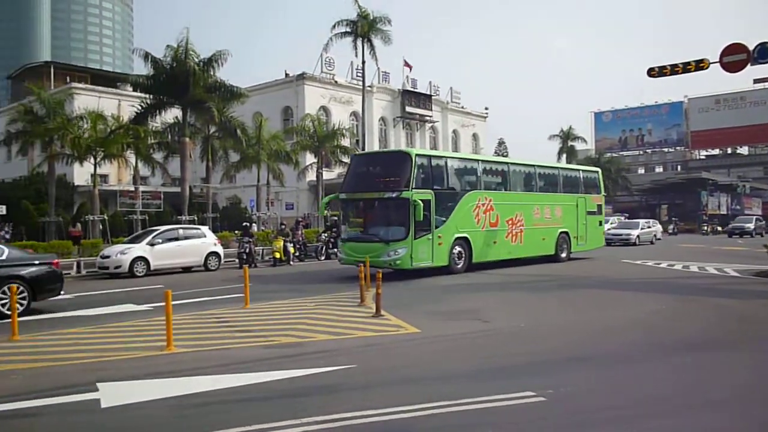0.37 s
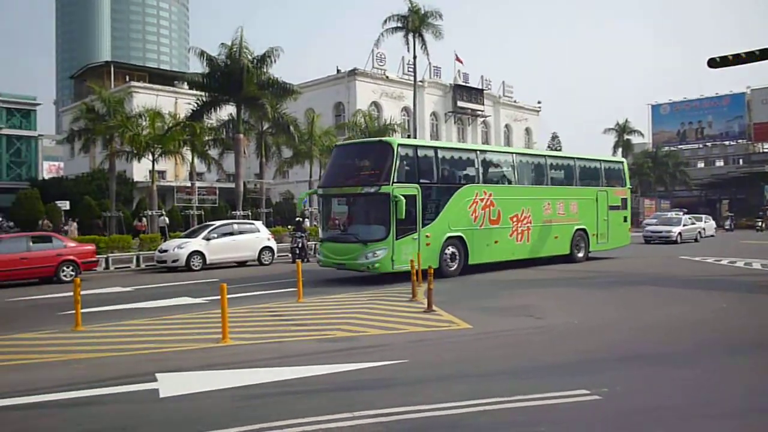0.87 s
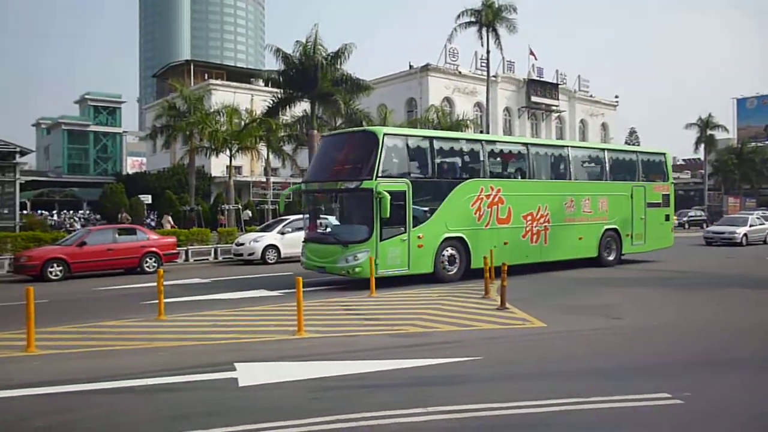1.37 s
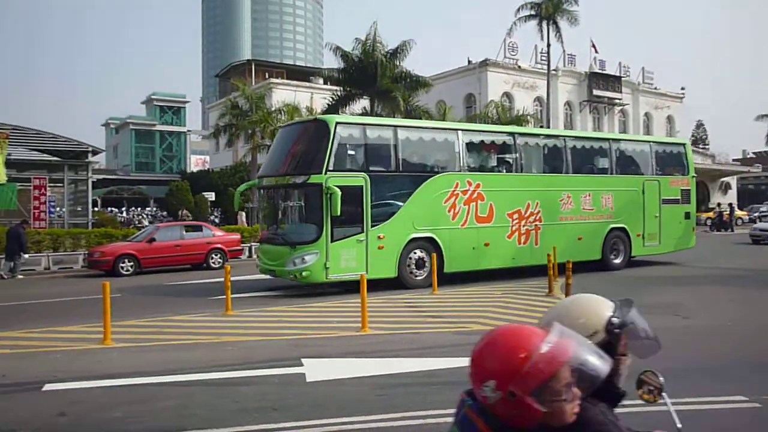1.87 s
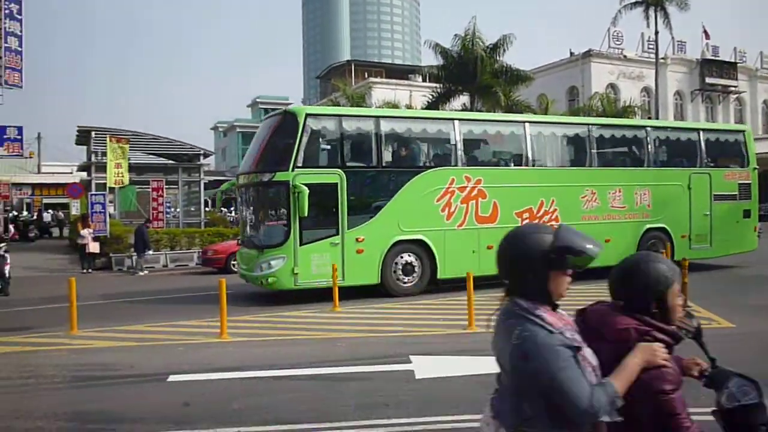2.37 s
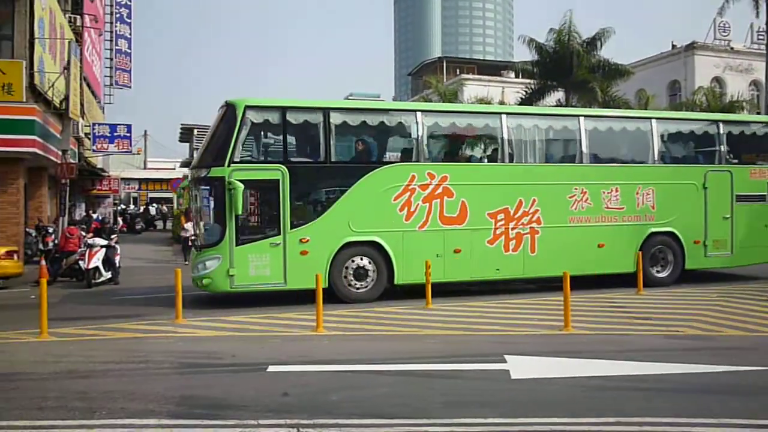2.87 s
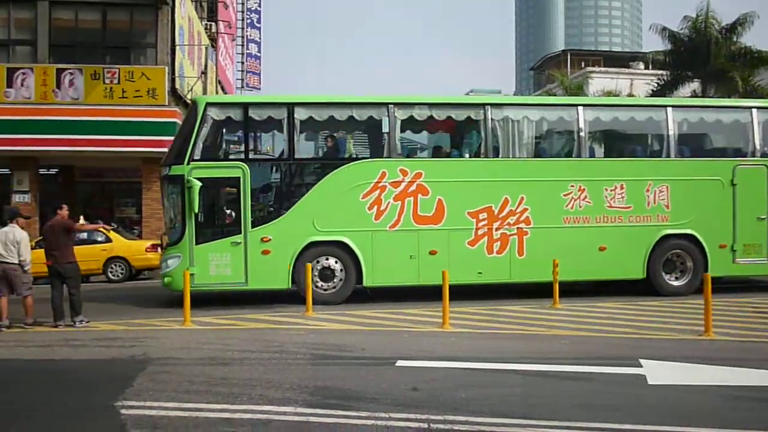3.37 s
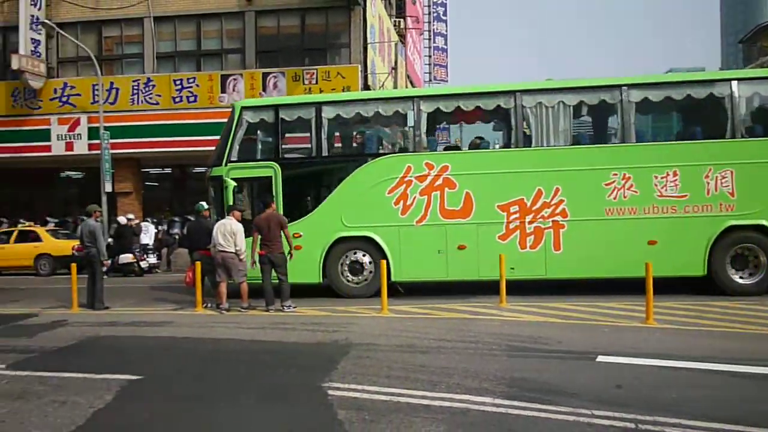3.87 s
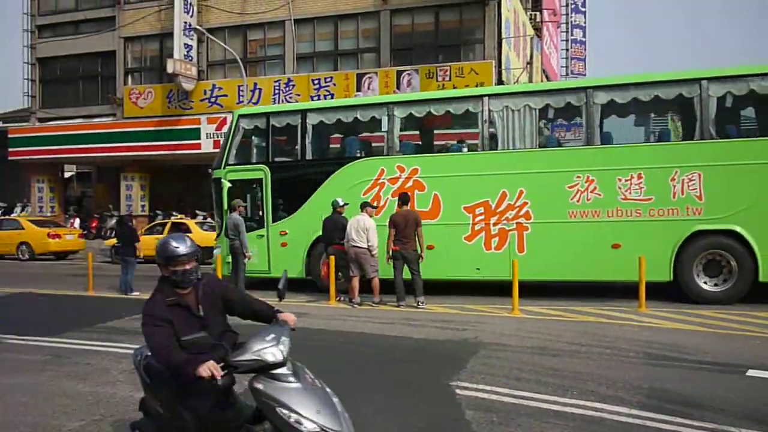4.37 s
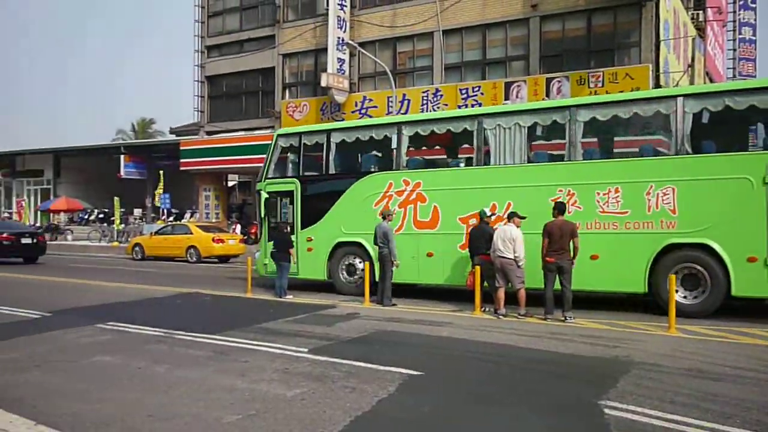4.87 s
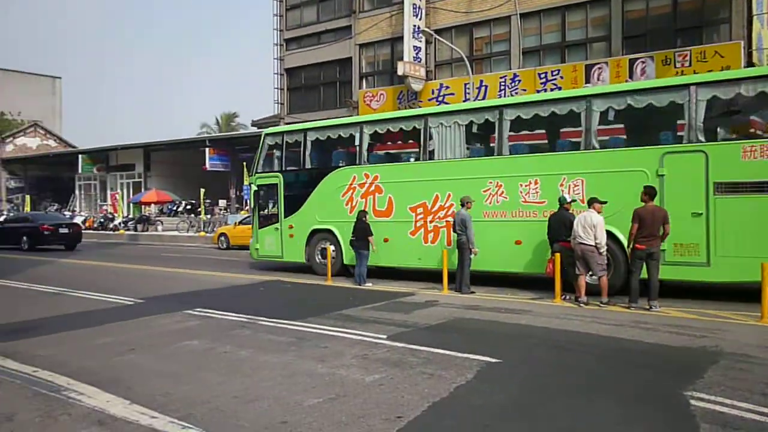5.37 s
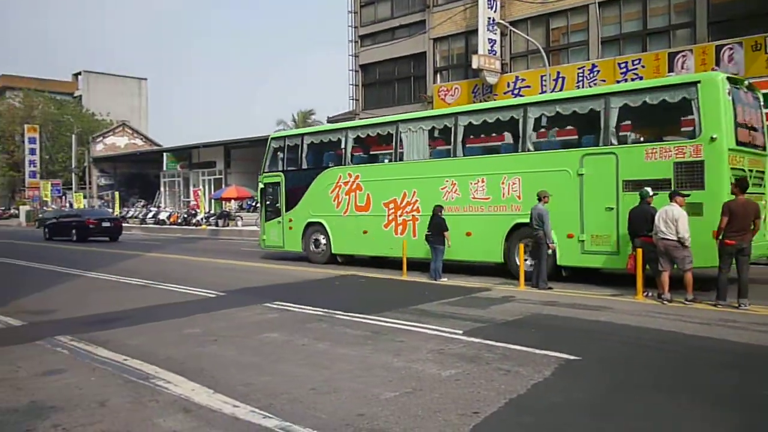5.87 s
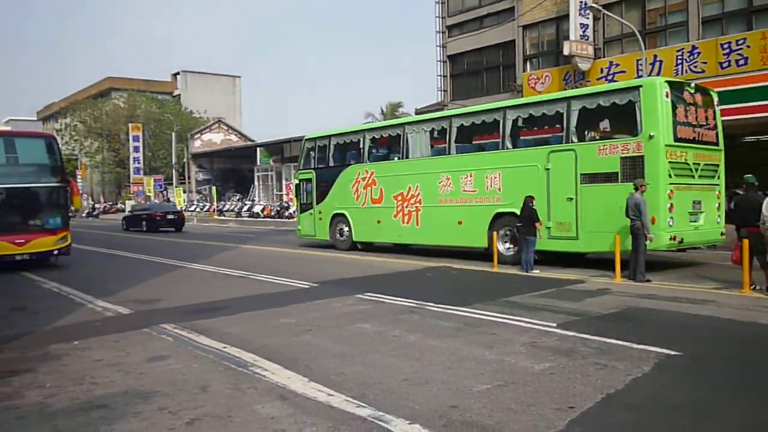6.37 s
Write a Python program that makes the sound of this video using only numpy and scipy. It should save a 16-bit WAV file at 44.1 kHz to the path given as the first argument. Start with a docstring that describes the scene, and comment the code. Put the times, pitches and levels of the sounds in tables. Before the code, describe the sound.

A small camera microphone stands in the wind beside a busy city junction. From 0 s a dull, lumpy traffic drone runs continuously, with soft hiss and low hums from passing vehicles. Wind thumps begin around 0.4 s and come in rough clusters, momentarily pushing the rest down. A faint, very short puff of air comes at 1.1 s. Breathier whines pass from 1.5 to 2.6 s, with hiss strongest near 1.9 s. From 2 to 3.2 s a deep engine throb sags in pitch and fades. Gusts grow hardest from 3.2 to 3.85 s, slightly overloading, then abruptly cease; the street is quieter. A new engine note enters, dips until 4.4 s, then climbs. A vehicle whines by from 4.6 to 5.1 s; at 4.9 s the engine opens into a hollow boom, gradually receding as it rises slightly. Crisp air-valve spits sound at 6.2 s and just before the end, at 6.7 s.

```python
"""Busy roundabout in the wind

Distant traffic is bands of shaped noise; vehicles whine past as noise in unsteady resonances.
A near engine, a harmonic series on its firing rate, sags and climbs; three puffs of air, the first
fainter and shorter, are shaped noise bursts. Wind thumps are short pressure swings with rough edges;
the level of the other sounds steps down and recovers.
Soft overload, four notches and a band limit make the sound of a small camera."""
import sys
import numpy as np
from scipy import signal
from scipy.io import wavfile
from scipy.ndimage import uniform_filter1d

SR = 44100
rng = np.random.default_rng(int(sys.argv[2]) if len(sys.argv) > 2 else 0)


def generate_wav(signal):
    """Clip the signal to [-1, 1] and save it as 16-bit WAV at the path in sys.argv[1]."""
    frames = np.transpose(np.atleast_2d(signal))
    scaled = np.clip(frames, -1, 1) * 32767
    pcm = np.round(scaled).astype(np.int16)
    wavfile.write(sys.argv[1], SR, pcm)


def ratio_of_db(decibels):
    """Turn decibels (scalar or array-like) into linear amplitude factors; 0 dB maps to 1."""
    return 10 ** (np.asarray(decibels, float) / 20)


N = 297234  # length in samples

# relative spectra of the traffic and wind layers, lowest first: frequency_hz, density_db
RUMBLE_SPECTRUM = [(15, -16), (30, -10.5), (70, -1), (130, 3.5), (250, -5.5), (450, -7), (1000, -23.5)]
DRONE_SPECTRUM = [(25, -20.5), (60, -9), (110, -5.5), (170, 2), (300, -0.5), (480, -4.5), (800, -25.5)]
ROAR_SPECTRUM = [(250, -5), (500, -4), (750, -1.5), (1200, -7.5), (1450, -14), (1900, -40)]
HISS_SPECTRUM = [(1100, -36.5), (1700, 0), (2200, -2.5), (2750, -1), (3600, -5), (5000, -16.5)]
FIZZ_SPECTRUM = [(2800, -25.5), (4200, 0.5), (5500, 0.5), (7000, -0.5), (8200, -12.5), (8900, -19)]
# level of the distant traffic: time_s, level_db
STREET_LEVEL = [(0, -30), (.5, -29), (.95, -30), (1.2, -27), (1.45, -30.5), (1.8, -32), (2.2, -30),
                (2.6, -29), (3.1, -29.5), (3.6, -31.5), (3.86, -35.5), (4.3, -34), (4.6, -29), (5.0, -30),
                (5.3, -33.5), (5.9, -34.5), (6.4, -36), (6.74, -35)]
# strength of the wind buffeting the microphone: time_s, level_db
WIND_LEVEL = [(0, -29.5), (.6, -29), (.85, -27.5), (1.2, -24), (1.5, -28.5), (1.8, -28), (2.3, -36),
              (2.6, -25.5), (2.8, -32), (3.05, -22), (3.35, -26.5), (3.62, -17.5), (3.84, -23), (3.88, -38),
              (4.2, -42), (4.6, -34), (5.6, -34.5), (6.74, -34)]
# vehicles going by, which add hiss and fizz: closest_s, fizz_db, half_power_s (time until 3 dB softer)
PASSES = [(.6, -47.5, -0.3), (1.3, -45.5, 0.23), (1.9, -39.5, 0.28), (2.5, -41.5, 0.23), (3.5, -43, .2),
          (4.7, -40.5, 0.1879), (5.8, -48, 0.84)]
# levels relative to the street, but BUFFET_DB (drone) to the wind and PASS_HISS_DB to the fizz of a pass
DRONE_DB, HISS_DB, FIZZ_DB, BUFFET_DB, PASS_HISS_DB = 1.5, -10.5, -19.5, 2, 1

# hardest wind thumps on the microphone: centre_s, swing_db, pitch_hz
HARD_THUMPS = [(0.426, -13.5, 140), (0.57, -13, 257), (0.949, -12, 177), (1.029, -15, 198),
               (1.173, -9, 173), (1.395, -10, 222), (1.43, -14.5, 158), (1.583, -19, 305),
               (1.614, -13, 380), (1.63, -13.5, 222), (1.662, -9, 242), (1.77, -14.5, 189),
               (1.906, -13, 250), (1.914, -14.5, 229), (1.927, -13, 209), (1.975, -11.5, 200),
               (2.034, -15.5, 140.2), (2.547, -12, 165), (2.584, -13.5, 382), (2.642, -12.5, 175),
               (2.75, -16, 259), (2.838, -13.5, 420), (2.848, -13.5, 255), (3.006, -11.5, 239),
               (3.03, -13, 139), (3.214, -10.5, 214), (3.226, -12.5, 252), (3.259, -8.5, 167.2),
               (3.426, -11, 327), (3.494, -14, 110), (3.504, -8.5, 205), (3.54, -11, 180),
               (3.6, -10.5, 143), (3.616, -9.5, 280), (3.651, -10, 285), (3.667, -11.5, 253),
               (3.691, -3.5, 248), (3.752, -21, 180), (3.791, -20.5, 220), (3.834, -12, 182),
               (3.844, -7, 238)]
# rough edge of a thump: dB at 200 Hz, plus dB for each dB of swing, plus dB for each octave of pitch
EDGE_DB, EDGE_GROWTH, EDGE_OCTAVE_DB = -27, 0.34, 4.5
# light thumps: number a second, dB over the wind, spread either way in dB, pitch range in Hz
TAPS_PER_S, TAP_DB, TAP_SPREAD_DB, TAP_LOW_HZ, TAP_HIGH_HZ = 7, 7.5, 4.5, 120, 300

# noisy notes of passing vehicles, exhaust hum to belt and gear whine: start_s, end_s, pitch_hz, width_hz, level_db
WHINES = [(.15, .6, 153, 8, -33), (.4, .8, 196, 8, -33), (.5, .85, 360, 10, -35), (.8, 1.15, 148, 8, -30),
          (.85, 1.3, 346, 10, -36), (.4, 1.25, 675, 120, -38), (1.45, 2.2, 850, 300, -35),
          (1.49, 1.6, 4700, 250, -50), (1.52, 1.74, 3450, 220, -49), (1.66, 2.0, 3700, 380, -42),
          (1.73, 1.81, 2420, 150, -48), (1.85, 2.25, 3150, 800, -43), (2.2, 2.6, 2950, 900, -42),
          (2.25, 2.34, 4220, 250, -48), (4.55, 5.12, 2750, 450, -38.5), (4.9, 5.4, 2770, 200, -47),
          (4.6, 5.08, 5150, 1100, -42), (4.92, 5.0, 5000, 200, -47)]
# downward steps of level, each of which fades away: time_s, step_db
LEVEL_STEPS = [(0.72, -2), (0.95, -5), (1.176, -5), (2.552, -6.5), (3.031, -3), (3.5, -3.5), (3.691, -6.5)]
RECOVERY_S = 0.64  # time constant

# air valve: start_s, level_db, decay_ms
PUFFS = [(1.134, -37, 24), (6.167, -29.5, 40), (6.675, -29.5, 42)]
# relative spectrum of the air jet: frequency_hz, density_db
PUFF_SPECTRUM = [(1200, -25), (2300, -5), (3000, 10), (4000, 1), (5200, 4), (7000, 3), (9000, -13)]

# near engine, one table for each stretch: time_s, firing_hz, load_db
ENGINE_STRETCHES = [
    [(2.0, 36.6, -44), (2.26, 34.9, -29), (2.45, 32.6, -27.5), (2.7, 30.1, -26), (3.0, 28.6, -28),
     (3.25, 27.5, -40)],
    [(3.88, 41.3, -40), (3.96, 40.5, -36), (4.12, 37.5, -32), (4.4, 35.2, -27), (4.69, 38.7, -25),
     (5.0, 40.8, -26), (5.3, 40.2, -27), (5.72, 40.8, -27), (6.15, 43.4, -30), (6.27, 43.8, -34.5),
     (6.74, 43.9, -36)],
]
# one firing of each stretch, which times all the others: firing_s
FIRING_TIMES = [2.422, 5.127]
# colour of the exhaust pipe before scaling: frequency_hz, gain_db
EXHAUST_COLOUR = [(30, -25.5), (80, -19.5), (120, -12.5), (160, -3.5), (198, 1), (245, -7), (325, -7.5),
                  (370, -13.5), (410, -17), (570, -16), (700, -19.5)]
# the first stretch sounds deeper, as from a longer pipe: frequency_factor for each stretch
PIPE_SCALES = [.74, 1.]
# the boom opens when the tailpipe turns to the microphone, then fades with distance
BOOM_HZ, BOOM_WIDTH_HZ = 468, 42
BOOM_S, BOOM_OPEN_S, BOOM_DB, BOOM_DB_PER_S = 4.9, 0.027, 18.5, -2.5

# notches of the camera's filter: frequency_hz, width_hz
NOTCHES = [(1400, 230), (1601, 466), (2150, 149), (7997, 860)]
CEILING = .38  # limit of the microphone's soft overload, full scale = 1
EDGE_HZ = 8350  # band limit
OFFSET = .0141  # constant offset of the converter, full scale = 1


def evened(x):
    """Normalisation of mean power: scales to rms 1."""
    return x / np.sqrt(np.mean(x ** 2) + 1e-20)


def add(mix, s, sound):
    """Superposition: mixes a sound in at s seconds."""
    part = mix[max(round(s * SR), 0):][:len(sound)]
    part += sound[:len(part)]


def resonate(x, hz, width_hz):
    """Heterodyne resonance of gain 1: shifts the curve hz to zero, smooths, shifts back."""
    turn = np.exp(2j * np.pi * np.cumsum(hz * np.ones(len(x))) / SR)
    r = np.exp(-np.pi * width_hz / SR)
    smooth = signal.lfilter([1 - r], [1, -r], x / turn)
    return 2 * (turn * smooth).real


def wander(size, hz):
    """Low-pass random process of rms 1, changing about hz times a second."""
    knot_rate_hz = 200
    knots = rng.standard_normal(int(size / SR * knot_rate_hz) + 2)
    knots = uniform_filter1d(knots, max(int(knot_rate_hz / hz), 1))
    return evened(np.interp(np.arange(size) * knot_rate_hz / SR, np.arange(len(knots)), knots))


def noise(spectrum, size, patchy_db):
    """Spectral synthesis: random short-time spectra of one colour, in louder and softer patches."""
    frames, hz = size // 256 + 5, np.fft.rfftfreq(1024, 1 / SR)
    real, imaginary, patches = rng.standard_normal((frames, 513, 3)).T
    patches = uniform_filter1d(patches, size=10, axis=0)
    patches = evened(uniform_filter1d(patches, size=10, axis=1))
    f, db = np.transpose(spectrum)
    colour_db = np.interp(np.log(hz + 1), np.log(f + 1), db, -70, -70)
    z = (real + 1j * imaginary) * ratio_of_db(colour_db[:, None] + patchy_db * patches)
    return evened(signal.istft(z, nperseg=1024, noverlap=768)[1][:size])


def traffic():
    """Sum of incoherent sources: engine, tyre and wind noise, lumpy below and fluttering together above."""
    t = np.arange(N) / SR
    roar = ratio_of_db(np.interp(t, *np.transpose(STREET_LEVEL)))
    rumble = ratio_of_db(np.interp(t, *np.transpose(WIND_LEVEL)))
    passing = np.sqrt(sum(ratio_of_db(db) ** 2 / (1 + ((t - s) / half_s) ** 2) for s, db, half_s in PASSES))
    # independent parts add in power
    drone = np.hypot(ratio_of_db(DRONE_DB) * roar, ratio_of_db(BUFFET_DB) * rumble)
    hiss = np.hypot(ratio_of_db(HISS_DB) * roar, ratio_of_db(PASS_HISS_DB) * passing)
    fizz = np.hypot(ratio_of_db(FIZZ_DB) * roar, passing)
    lumps, flutter = wander(N, hz=40.25), wander(N, hz=24.4)
    low = rumble * noise(RUMBLE_SPECTRUM, N, patchy_db=-0.2) * ratio_of_db(0.65 * lumps)
    low += drone * noise(DRONE_SPECTRUM, N, patchy_db=1.5) * ratio_of_db(1.77 * lumps - 3.5)
    low += roar * noise(ROAR_SPECTRUM, N, patchy_db=1.0) * ratio_of_db(0.97 * lumps)
    high = hiss * noise(HISS_SPECTRUM, N, patchy_db=0.5)
    high += fizz * noise(FIZZ_SPECTRUM, N, patchy_db=1.0) * ratio_of_db(0.97 * wander(N, hz=70))
    return low + high * ratio_of_db(0.46 * flutter)


def thump(s, db, hz, phase):
    """Wind pressure on a microphone: a lump about one cycle long, with a short rough edge that reaches higher."""
    t = np.arange(-1024, 1024) / SR
    swing = np.cos(2 * np.pi * (hz * t + phase)) * np.exp(-(t * hz / 0.53) ** 2)
    edge = rng.standard_normal(len(t))
    edge = resonate(resonate(edge, 650, 700), 650, 700)
    edge = evened(edge) * np.exp(-(t / .0035) ** 2)
    edge_db = EDGE_DB + EDGE_GROWTH * db + EDGE_OCTAVE_DB * np.log2(hz / 200)
    return s - 1024 / SR, ratio_of_db(db) * swing + ratio_of_db(edge_db) * edge


def taps():
    """Random arrivals: rows of light thumps (s, dB, Hz), whose level follows the wind."""
    when, size, pitch = rng.random((round(TAPS_PER_S * N / SR), 3)).T
    s = .03 + when * (N / SR - .03)
    db = np.interp(s, *np.transpose(WIND_LEVEL)) + TAP_DB + TAP_SPREAD_DB * (2 * size - 1)
    return list(zip(s, db, TAP_LOW_HZ * (TAP_HIGH_HZ / TAP_LOW_HZ) ** pitch))


def whine(start, end, mid_hz, width_hz, db):
    """Resonant filtering: noise in an unsteady resonance that swells and fades as the vehicle passes."""
    size = round((end - start) * SR)
    drift, chatter = wander(SR, hz=18)[:size], wander(SR, hz=35)[:size]
    hz = mid_hz + .15 * width_hz * drift
    band = rng.standard_normal(SR)[:size]
    band = resonate(resonate(band, hz, width_hz), hz, width_hz)
    # the broad ones come in bursts
    depth_db = 1.8 * min(width_hz / 200, 1)
    return start, ratio_of_db(db + depth_db * chatter) * evened(band) * np.sqrt(2 * np.hanning(size))


def level_steps():
    """Exponential relaxation: the gain steps down at set times and creeps back."""
    t = np.arange(N) / SR
    return ratio_of_db(sum(db * (t > s) * np.exp(-np.maximum(t - s, 0) / RECOVERY_S) for s, db in LEVEL_STEPS))


def puff(s, db, ms):
    """Turbulent jet noise: a valve snaps open, the jet weakens and shuts, and the street rings on briefly."""
    u = np.arange(SR // 8) / SR / (ms / 1000)  # time in decay lengths
    opening = np.minimum(u * 12, 1)
    closing = .25 + .75 / (1 + u ** 8)
    shape = opening * ratio_of_db(-5 * u) * closing
    return s, ratio_of_db(db) * shape * noise(PUFF_SPECTRUM, len(u), patchy_db=1.1)


def engine(rows, firing_s, pipe_scale):
    """Harmonic series of the firing rate, each multiple wavering; those near the boom swell with it."""
    s, *columns = np.transpose(rows)
    t = np.arange(s[0], s[-1], 1 / SR)
    hz, load_db = (np.interp(t, s, c) for c in columns)
    boom_open = (1 + np.tanh((t - BOOM_S) / BOOM_OPEN_S)) / 2
    boom_db = (BOOM_DB + BOOM_DB_PER_S * (t - BOOM_S)) * boom_open
    turns = np.cumsum(hz * (1 + .002 * wander(len(t), hz=8))) / SR  # firings so far
    turns -= np.interp(firing_s, t, turns)
    pipe_hz, pipe_db = np.transpose(EXHAUST_COLOUR)
    out = np.zeros(len(t))
    for k in range(1, 19):
        near = np.exp(-((k * hz - BOOM_HZ) / BOOM_WIDTH_HZ) ** 2)
        level = ratio_of_db(np.interp(k * hz, pipe_scale * pipe_hz, pipe_db) + near * boom_db)
        waver = 1 + .24 * wander(len(t), hz=7)
        # the high multiples arrive first, so each pulse is drawn out into a falling chirp
        lag = .2 - .024 * (k - 5) ** 2  # in cycles
        # reflections off passing vehicles slide the multiples against each other
        lag = lag + .13 * wander(len(t), hz=3)
        out += level * waver * np.cos(2 * np.pi * (k * turns - lag))
    return s[0], np.sqrt(2) * ratio_of_db(load_db) * out * signal.windows.tukey(len(t), .04)


def scene():
    """Superposition: street sounds and light thumps under the level steps, then the hard wind thumps."""
    street = traffic()
    for row in taps():
        add(street, *thump(*row, phase=rng.random()))
    for row in WHINES:
        add(street, *whine(*row))
    for row in PUFFS:
        add(street, *puff(*row))
    for stretch in zip(ENGINE_STRETCHES, FIRING_TIMES, PIPE_SCALES):
        add(street, *engine(*stretch))
    street *= level_steps()
    for row in HARD_THUMPS:
        add(street, *thump(*row, phase=rng.random()))
    return street[None]


def low_pass(x):
    """Removes everything above the highest recorded frequency."""
    return signal.sosfilt(signal.butter(12, 9175, fs=SR, output="sos"), x)


def record(dry):
    """Saturation and linear filtering: soft overload, notches, band limit, then the converter's offset."""
    x = CEILING * np.tanh(dry / CEILING)  # the hardest thumps are squeezed
    for hz, width_hz in NOTCHES:
        x = signal.lfilter(*signal.iirnotch(hz, hz / width_hz, SR), x)
    x = signal.sosfilt(signal.butter(20, EDGE_HZ, fs=SR, output="sos"), x)
    return low_pass(x + OFFSET)


dry = scene()
out = record(dry)
generate_wav(out)
```